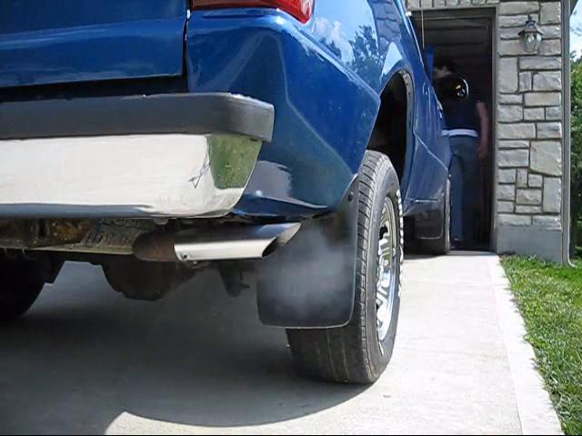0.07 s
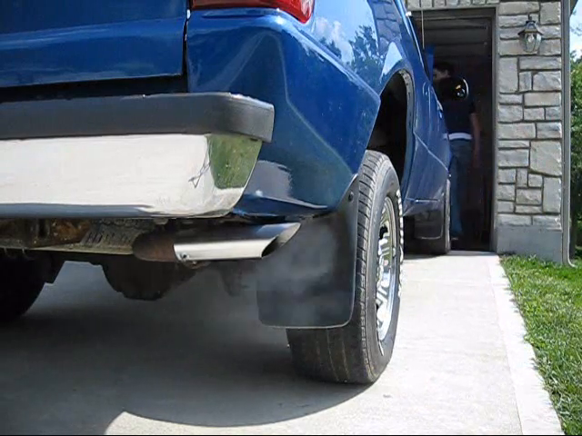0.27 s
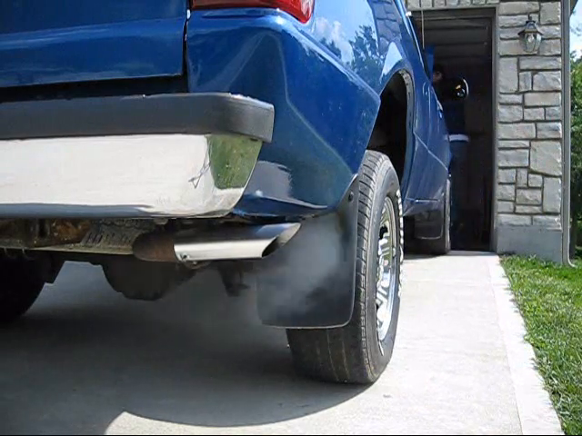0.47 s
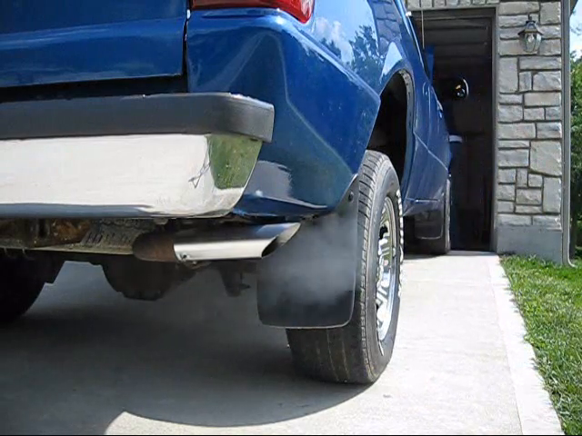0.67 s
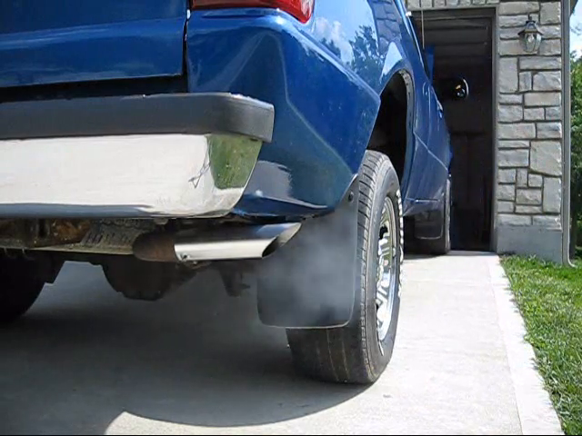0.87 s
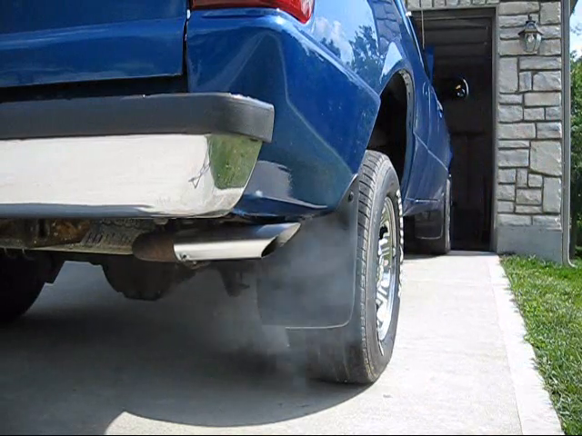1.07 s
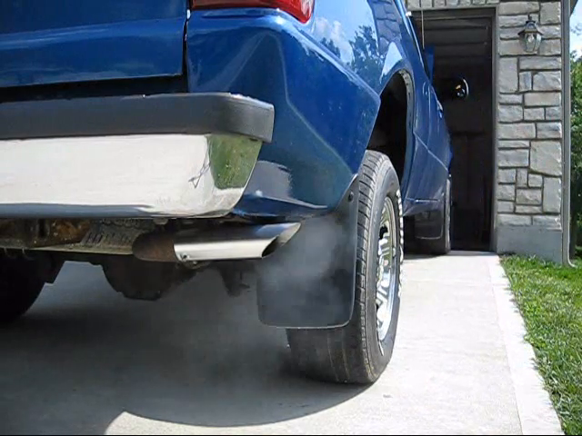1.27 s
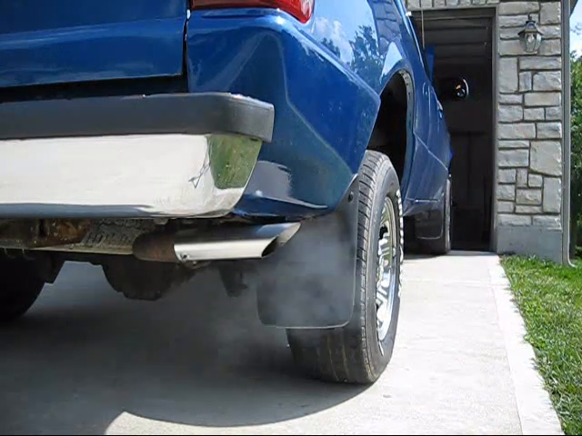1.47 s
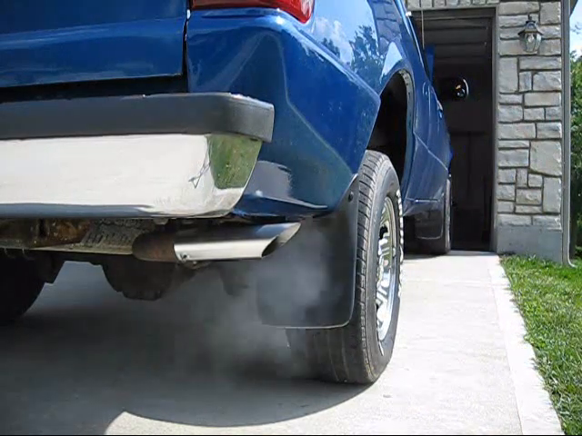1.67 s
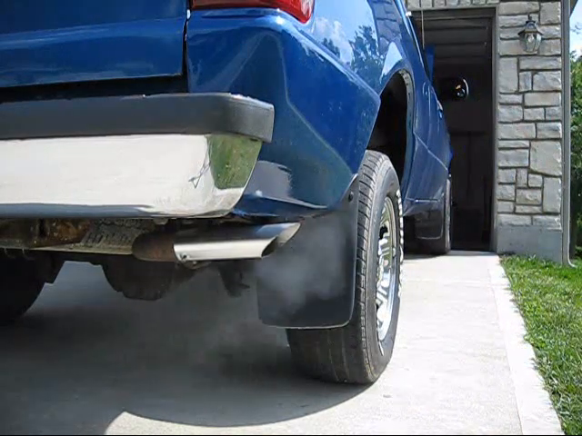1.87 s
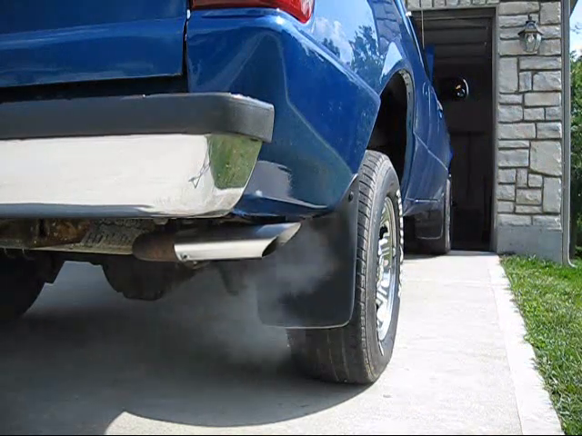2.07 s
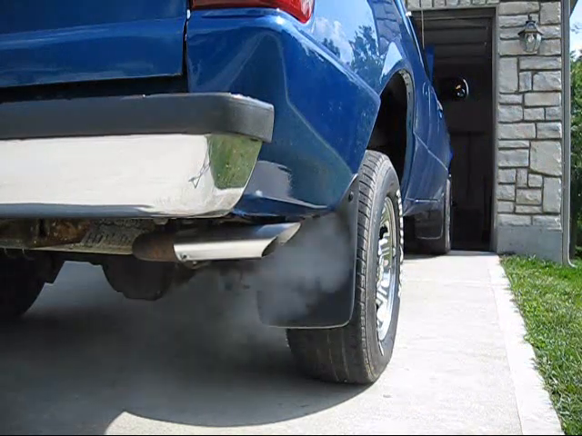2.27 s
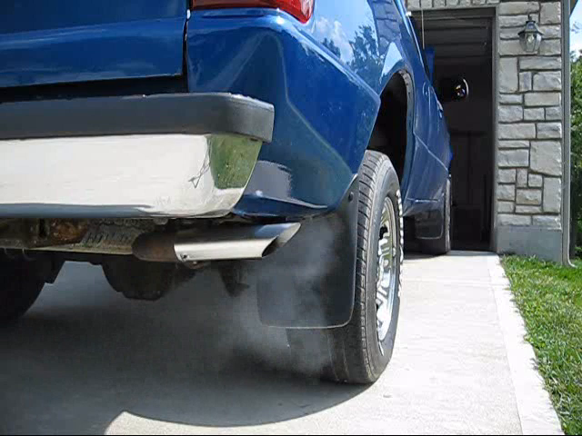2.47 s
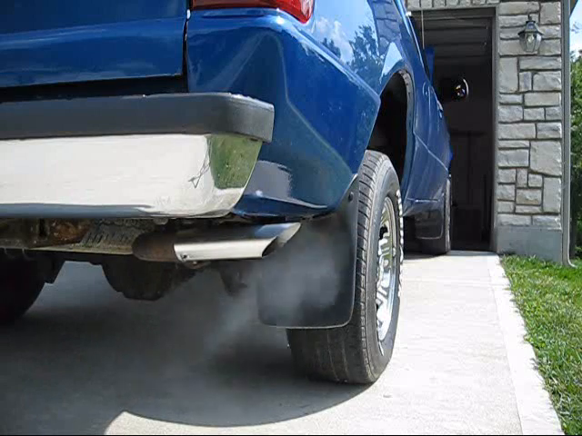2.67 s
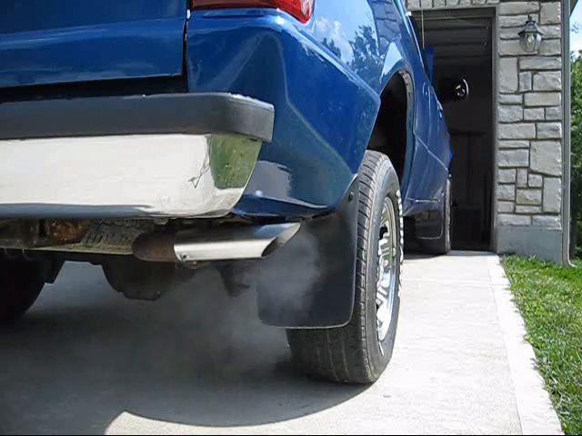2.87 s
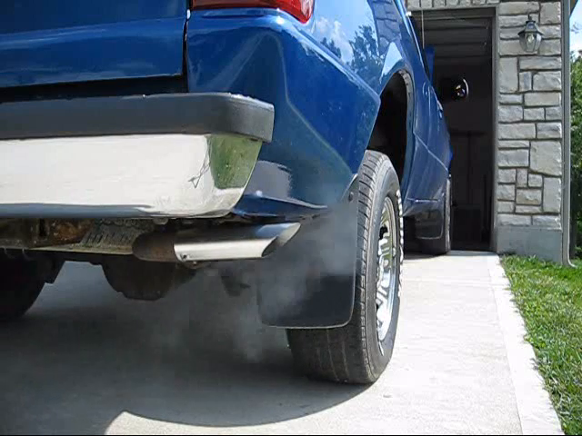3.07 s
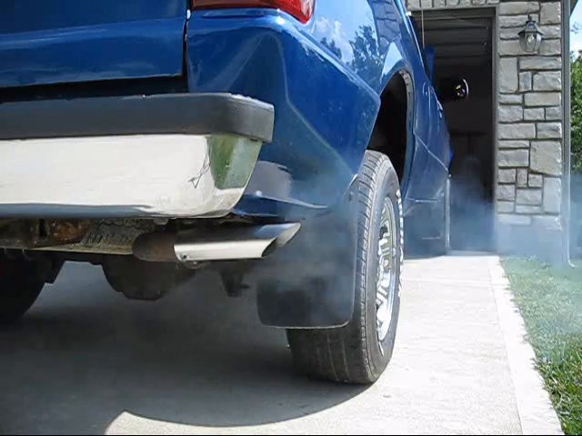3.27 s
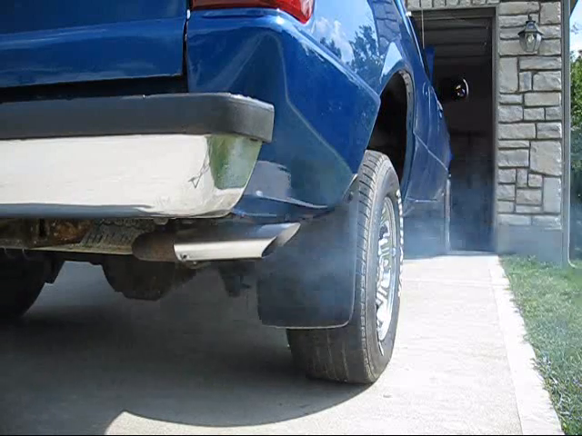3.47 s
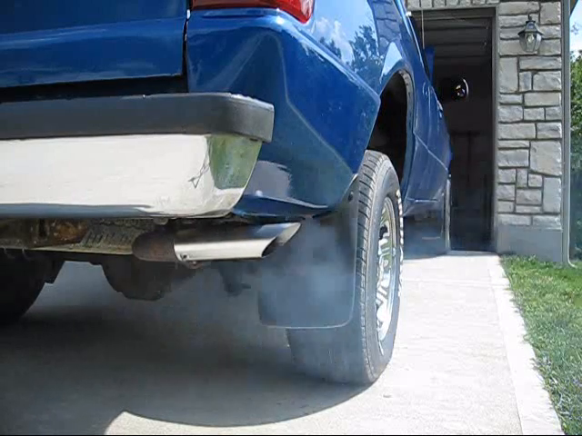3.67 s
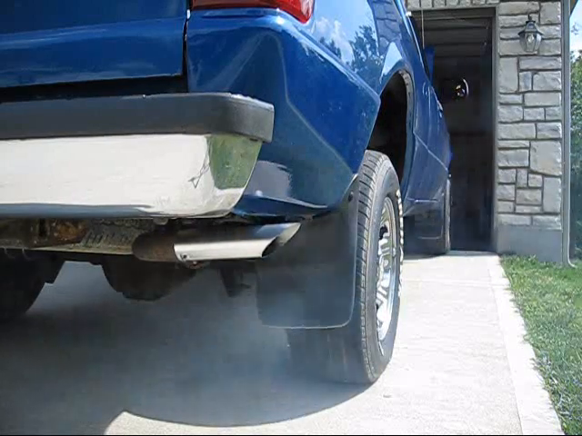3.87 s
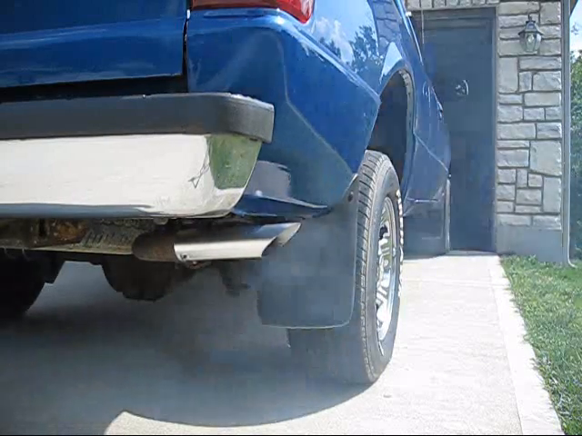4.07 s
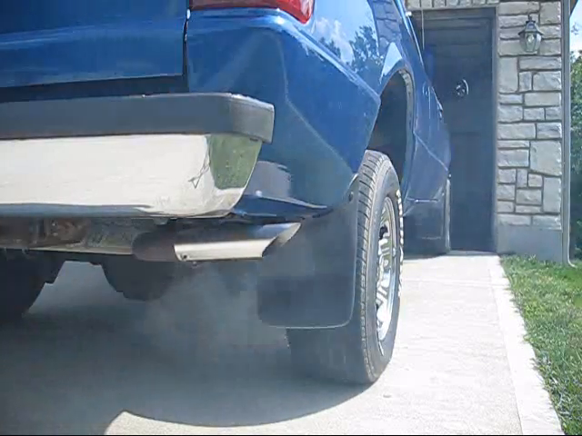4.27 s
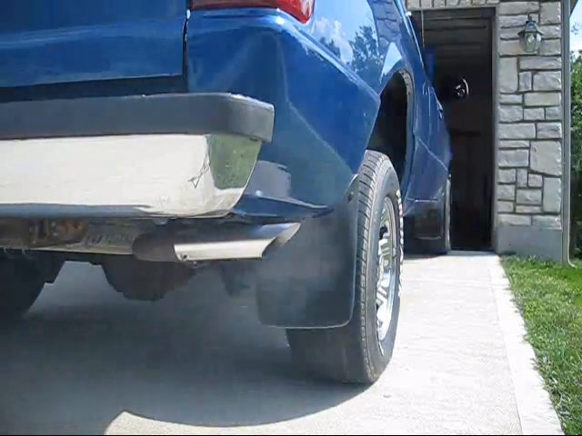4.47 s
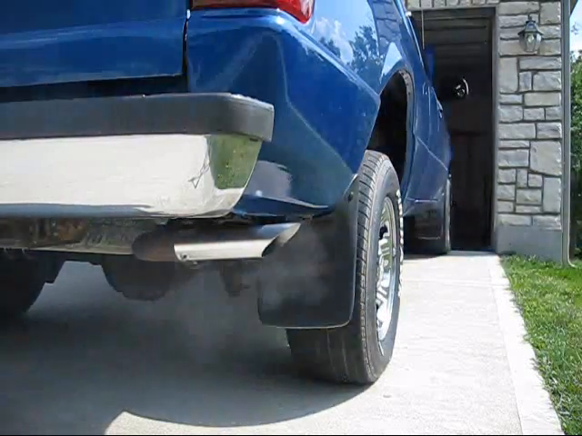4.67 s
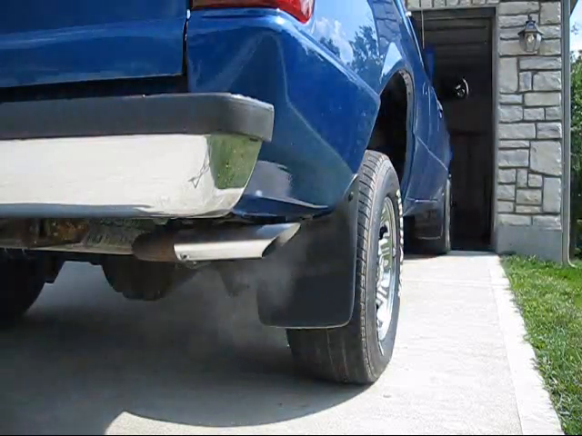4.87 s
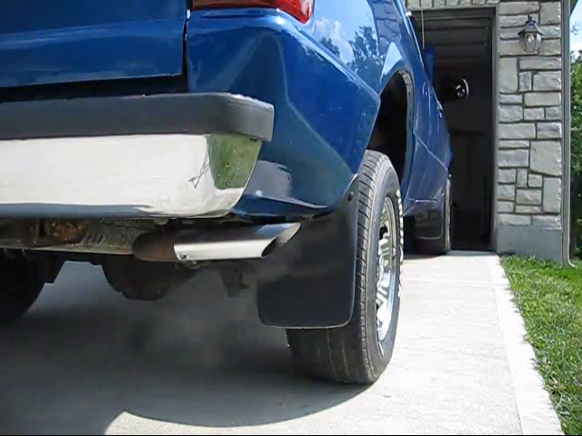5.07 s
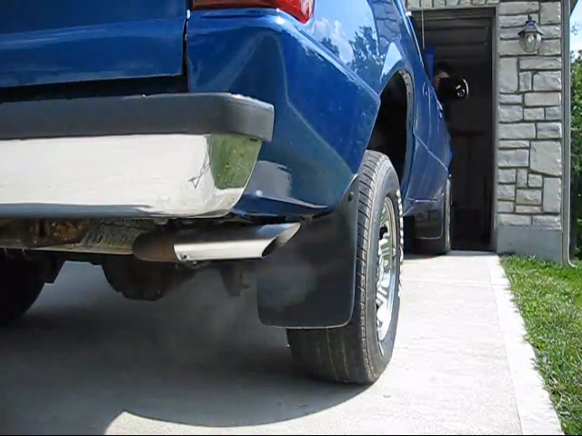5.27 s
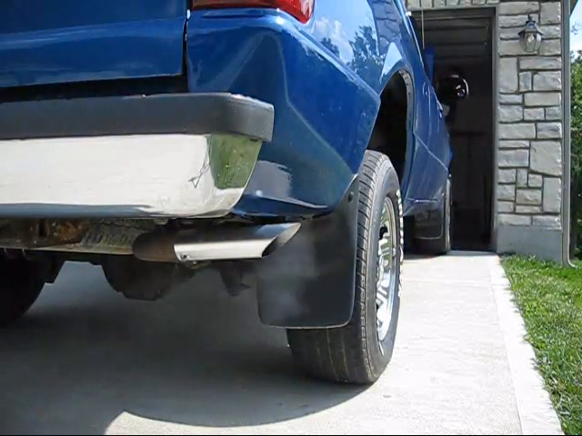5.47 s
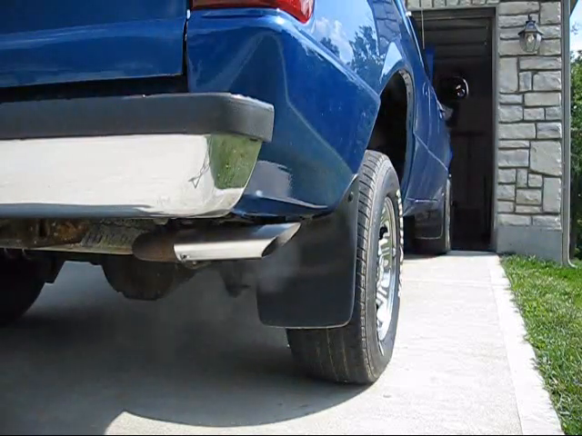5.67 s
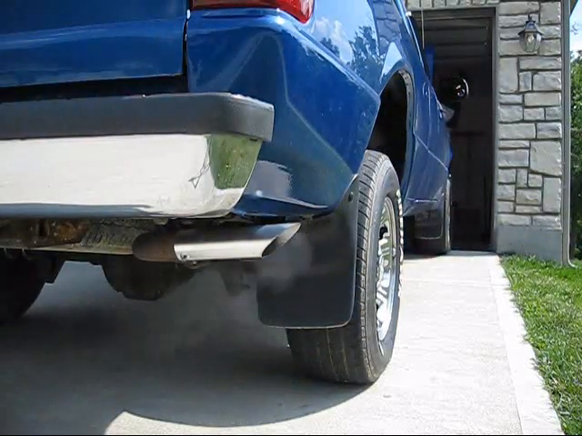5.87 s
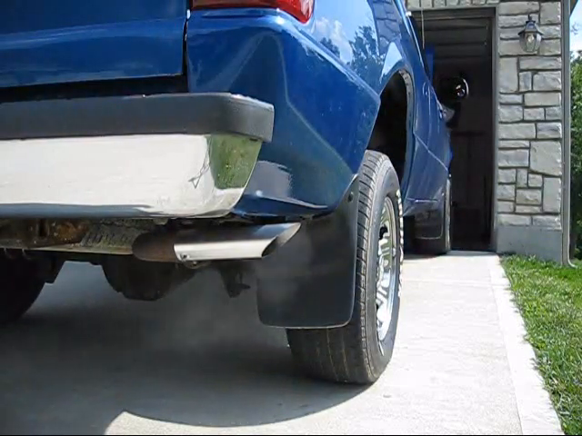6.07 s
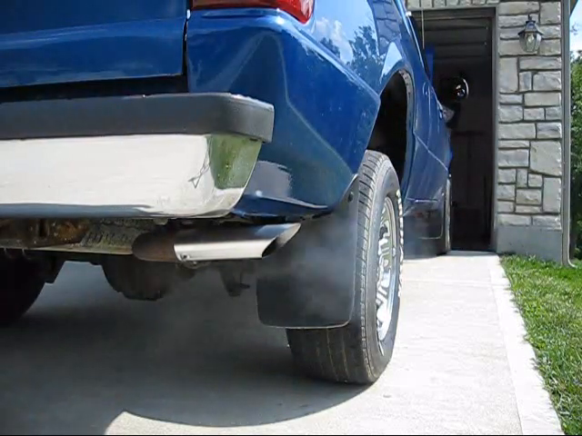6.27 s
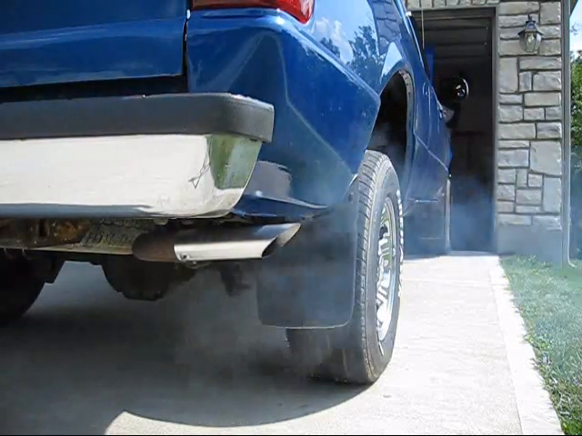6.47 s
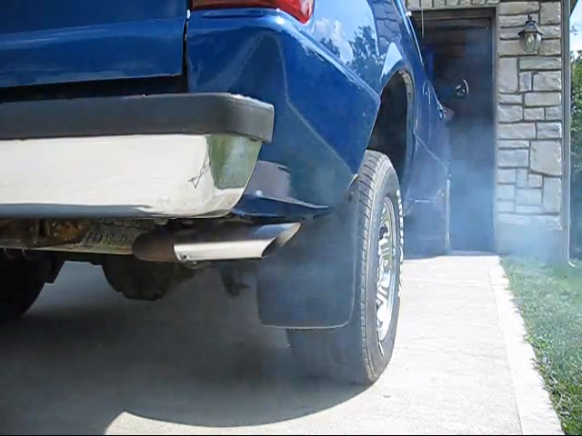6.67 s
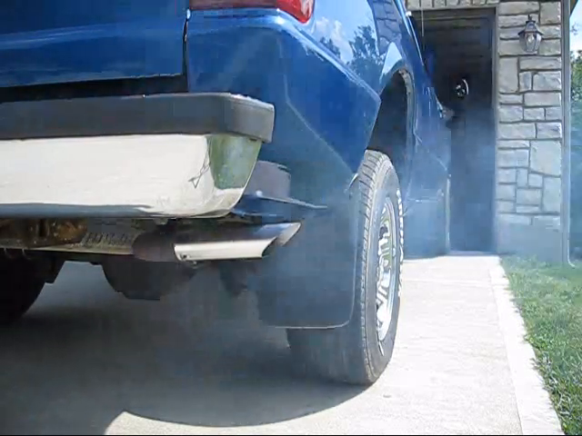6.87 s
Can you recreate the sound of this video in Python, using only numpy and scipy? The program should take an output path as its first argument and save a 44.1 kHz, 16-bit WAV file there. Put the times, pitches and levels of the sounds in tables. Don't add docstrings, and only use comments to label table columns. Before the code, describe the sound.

Outdoor close-up of an exhaust: soft, fast, lumpy idle pulses with breathy hiss, thin high insect chirps behind. After about three seconds the engine revs abruptly, rasping at first, then smoothly winds down. Dull wind buffets crowd the small microphone, thickest just before a second hard rev, which rises higher than the first and ends at full pitch.

```python
import sys
import numpy as np
from scipy import signal
from scipy.io import wavfile
from scipy.ndimage import uniform_filter1d

SR = 44100
rng = np.random.default_rng(int(sys.argv[2]) if len(sys.argv) > 2 else 0)


def output_pcm(signal):
    pcm = np.clip(np.atleast_2d(signal).T, -1, 1) * 32767
    wavfile.write(sys.argv[1], SR, np.round(pcm).astype(np.int16))


def voltage_ratio(level):
    return 10 ** (np.asarray(level, float) / 20)


N = 304731

# t/s, firings per second/Hz
SPEED = [(0.0, 35.71), (0.916, 34.76), (2.254, 35.7), (3.143, 35.31), (3.247, 43.88), (3.316, 61.16),
         (3.499, 81.34), (3.6, 84.01), (3.692, 81.25), (3.887, 69.39), (3.959, 68.03), (4.281, 50.22),
         (4.903, 40.19), (6.199, 33.92), (6.329, 42.25), (6.619, 91.75), (6.755, 103.2), (6.91, 105.26)]
RASP_IDLE_DB = -49.5


def in_time(rows):
    s, *columns = np.transpose(rows)
    return [np.interp(np.arange(N) / SR, s, c) for c in columns]


def rms_one(x):
    return x / np.sqrt(np.mean(x ** 2) + 1e-20)


def evened(x, span_s):
    return x / np.sqrt(uniform_filter1d(x * x, size=int(span_s * SR)) + 1e-12)


def drift(rate):
    r = np.exp(-80 * np.pi * rate / SR)
    white = rng.standard_normal(N // 40 + 2002)
    slow = signal.lfilter([1], [1, -2 * r, r * r], white)[2000:]
    return np.interp(np.arange(N) / 40, np.arange(len(slow)), rms_one(slow))


def resonance(x, hz, width_hz):
    r = np.exp(-np.pi * width_hz / SR)
    top = (1 - r * r) / 2 * np.array([1, 0, -1])
    return signal.lfilter(top, [1, -2 * r * np.cos(2 * np.pi * hz / SR), r * r], x)


def sharp_resonance(x, hz, width_hz):
    return resonance(resonance(x, hz, width_hz), hz, width_hz)


def coloured_noise(spectrum, patchy_db):
    hz, level_db = np.transpose(spectrum)
    edges = np.geomspace(hz[0], hz[-1], int(3 * np.log2(hz[-1] / hz[0])) + 1)
    white, out = rng.standard_normal((2, N)), 0
    for k, (low, high) in enumerate(zip(edges, edges[1:])):
        band_filter = signal.butter(2, [low, high], "band", fs=SR, output="sos")
        band = signal.sosfilt(band_filter, white[k % 2])
        band_db = np.interp(np.log(low * high) / 2, np.log(hz), level_db)
        out = out + band * voltage_ratio(band_db + patchy_db * drift(18))
    return rms_one(out)


def bursts(events, length_s, damping):
    out, size = np.zeros(N), 4096
    t = np.arange(size) / SR
    for (s, peak_db, hz), noise in zip(events, rng.standard_normal((len(events), size))):
        lump = noise * t * np.exp(-t / length_s)
        lump = sharp_resonance(lump, hz, damping * hz)
        i = int(s * SR)
        out[i:i + size] += voltage_ratio(peak_db) * lump / np.max(np.abs(lump))
    return out


def octaves_over_idle():
    return np.maximum(np.log2(in_time(SPEED)[0] / 35), 0)


def rasp_db():
    # t/s, held/s, rasp level/dB
    blips = [
        (3.256, 0.08, -20),
        (3.72, .01, -50),
        (6.36, .005, -24),
        (6.41, 0.053, -19),
        (6.55, 0.034, -28),
    ]
    rise_db_per_s, fall_db_per_s = 277, 124
    t = np.arange(N) / SR
    levels = []
    for s, held, db in blips:
        before, after = np.maximum(s - t, 0), np.maximum(t - s - held, 0)
        levels.append(np.maximum(db - rise_db_per_s * before - fall_db_per_s * after, RASP_IDLE_DB))
    return np.max(levels, axis=0)


def throttle_load():
    return (rasp_db() - RASP_IDLE_DB) / 20


def exhaust_note(turns):
    # t/s, level/dB, halves (weak-strong firing)/dB, tilt per octave/dB
    engine = [(0, -28, -15, -4), (1.35, -27, -17, -0.5), (3.05, -30.5, 3, -2), (3.3, -9, -30, -4),
              (3.45, -17, -2, 1.5), (3.6, -11, -7.5, 1.5), (3.7, -26, 10, 8), (3.8, -17, 2.5, -9),
              (4.0, -18, 3.5, -2.5), (4.1, -37, 10.5, -6), (4.5, -22.5, -26, -1), (4.7, -22.5, -41, -8),
              (4.82, -34.5, -4, 0.5), (6.0, -27, -2, -0.5), (6.4, -12, -22, -6.5), (6.62, -12, 1, -1),
              (6.76, -12, -10, 13), (6.91, -18, -1.5, 17)]
    # f/Hz, level/dB
    standing = [(30, -44), (45, -30), (58, -10), (70, -8), (88, -11), (105, -11), (140, 0), (175, -10),
                (210, -7), (255, -13), (285, -15), (315, -28), (420, -26), (520, -34)]
    idle_focus = 1.3
    upper_hz, upper_db_per_octave = 204, 2
    per_s, = in_time(SPEED)
    level_db, half_db, tilt_db = in_time(engine)
    pipe_hz, pipe_db = np.transpose(standing)
    idle = 0.3 * np.clip((52 - per_s) / 14, 0, 1)
    note = 0
    for order in np.arange(1, 17) / 2:
        hz = order * per_s
        boost_db = np.interp(np.log(hz), np.log(pipe_hz), pipe_db)
        off_peak = idle * np.maximum(boost_db, -12)
        waver = 1 - off_peak
        order_db = boost_db + idle_focus * off_peak
        order_db = order_db + tilt_db * np.log2(np.minimum(hz, 230) / 140)
        order_db = order_db + half_db * (order % 1 > 0)
        upper = np.clip(hz / upper_hz - 0.5, 0, 1) ** 2
        order_db = order_db + upper_db_per_octave * octaves_over_idle() * upper
        swing = voltage_ratio(waver * drift(4))
        phase = 2 * np.pi * order * turns + 0.12 * waver * drift(3) + idle * order ** 2
        note = note - voltage_ratio(order_db) * swing * np.cos(phase)
    return np.sqrt(2) * voltage_ratio(level_db) * note


def ragged_pulses(at, chance, scatter_db, jitter_s):
    cylinder_db = [7.7, -1, 4.6, -5, 6.5, 3.5]
    # f/Hz, width/Hz, level/dB
    pipe_modes = [(95, 110, 0), (215, 130, -4), (430, 200, -18), (765, 60, -20)]
    level_db = np.minimum(-36.5 + 24 * octaves_over_idle(), -21)
    level_db = level_db - 5 * throttle_load()
    moved = np.clip(at + (jitter_s * SR * chance[:, 0]).astype(int), 0, N - 1)
    strength_db = np.array(cylinder_db)[np.arange(len(at)) % 6] + scatter_db * chance[:, 1]
    pulses = np.zeros(N)
    pulses[moved] = -voltage_ratio(strength_db) * chance[:, 0]
    soft_edges = signal.butter(2, (48, 500), "band", fs=SR, output="sos")
    pulses = signal.sosfilt(soft_edges, pulses) + 1e-18
    ringing = 0
    for k, (hz, width, db) in enumerate(pipe_modes):
        ringing = ringing + (-1) ** k * voltage_ratio(db) * resonance(pulses, hz, width)
    return voltage_ratio(level_db) * evened(ringing, span_s=0.36)


def rasp_puffs(at, chance):
    # f/Hz, width/Hz, level/dB
    rasp_colour = [(786, 380, 2.5), (1460, 490, 2.5), (2280, 530, -3), (3200, 770, -16.5),
                   (5700, 1700, -24.5)]
    puffs = np.zeros((len(rasp_colour), N))
    puffs[:, at] = voltage_ratio(1.5 * chance[:, 2] + 2.5 * chance[:, 3:].T)
    decay = np.exp(-1 / (0.0016 * SR))
    gates = signal.lfilter([1], [1, -2 * decay, decay ** 2], puffs)
    rasp = 0
    for gate, (hz, width, db) in zip(gates, rasp_colour):
        rasp = rasp + voltage_ratio(db) * sharp_resonance(gate * rng.standard_normal(N), hz, width)
    rasp = voltage_ratio(rasp_db()) * evened(rasp, span_s=0.074)
    return rasp, evened(gates.sum(axis=0), span_s=0.19)


def exhaust(scatter_db, jitter_s):
    turns = np.cumsum(in_time(SPEED)[0]) / SR
    note = exhaust_note(turns)
    at = np.flatnonzero(np.diff(np.floor(turns + 0.16)))
    chance = rng.standard_normal((1000, 8))[:len(at)]
    ragged = ragged_pulses(at, chance, scatter_db, jitter_s)
    rasp, gate = rasp_puffs(at, chance)
    return note + ragged + rasp, gate


def gas_flow(gate):
    # t/s, level/dB
    flow = [(0, 0.5), (3.1, 0), (3.25, 3), (3.36, 0), (3.47, -7), (3.58, 2), (3.7, 8.5), (3.81, 4.5),
            (3.98, -1), (4.08, 5.5), (4.3, 2.5), (5.2, .5), (6.2, 1), (6.43, 3.5), (6.55, -6.5), (6.68, -4),
            (6.85, 1.5), (6.91, 6)]
    # f/Hz, level per Hz/dB
    jet_colour = [(30, -5), (60, 4), (200, 2.5), (430, -6), (750, -6), (980, -8.5), (1590, -11),
                  (2330, -18), (4000, -42.5), (5200, -91)]
    # f/Hz, level per Hz/dB
    hiss_colour = [(2000, -0.5), (2600, 2.5), (3200, -1), (4000, -3), (6100, -4.5), (7000, -12),
                   (7600, -11), (8300, -20.5), (9500, -11.5), (11000, -6.5), (13000, -12.5)]
    # f/Hz, width/Hz, level/dB
    whistles = [(770, 90, -43), (1184, 35, -53), (1530, 70, -48)]
    # t/s, half length/s, level/dB
    swell = (2.115, 0.084, 2.9)
    flow_db, = in_time(flow)
    load = throttle_load()
    rise_db = 0.7 * flow_db + 5.5 * octaves_over_idle() + load
    at_s, half_s, swell_db = swell
    rise_db = rise_db + swell_db * np.exp(-((np.arange(N) / SR - at_s) / half_s) ** 2)
    jet = voltage_ratio(-29 + rise_db) * coloured_noise(jet_colour, patchy_db=0.5) * (0.9 + 0.085 * gate)
    late_load = np.roll(load, int(0.07 * SR))
    spit = 0.016 + 0.55 * late_load ** 2
    hiss = voltage_ratio(-37.5 + flow_db) * coloured_noise(hiss_colour, patchy_db=1.5)
    hiss = hiss * (1.068 + spit * gate) * voltage_ratio(0.23 * drift(13))
    tones = 0
    for hz, width, db in whistles:
        tone = rms_one(sharp_resonance(rng.standard_normal(N), hz, width))
        tones = tones + voltage_ratio(db + 0.29 * drift(2.3)) * tone
    return jet + hiss + tones * voltage_ratio(rise_db)


def insects():
    # f/Hz, from t/s, to t/s, level/dB
    trills = [(11702, 0, 1.3, -63), (11702, 2.05, 3.15, -58), (11702, 4.65, 6.0, -65), (11590, 0, 3.0, -66),
              (11590, 4.2, 6.0, -62), (11292, .2, 2.1, -62)]
    chirp_s = [.207, .38, .55, .74, .93, 1.13, 1.29, 1.44, 1.714, 1.89, 2.07, 2.235, 2.39, 2.54, 2.7, 2.87,
               3.19, 4.14, 4.3, 4.455, 4.78, 4.96, 5.14, 5.33, 5.5, 5.69, 5.94, 6.1, 6.33]
    t = np.arange(N) / SR
    out = bursts([(s, -43, 10300) for s in chirp_s], length_s=0.014, damping=0.013)
    for hz, start, end, db in trills:
        on = np.clip(np.minimum(t - start, end - t) / 0.05, 0, 1)
        trill = rms_one(sharp_resonance(rng.standard_normal(N), hz, 25))
        out = out + voltage_ratio(db + 2.5 * drift(8)) * on * trill
    return out


def breeze():
    # t/s, peak level/dB, f/Hz
    buffet_events = [(0.573, -14, 293), (0.72, -14.5, 235), (4.109, -9, 202), (4.245, -3, 380),
                     (4.265, -10, 235), (4.284, -17, 353), (4.364, -16, 258), (4.471, -14, 270),
                     (5.299, -11.5, 338), (5.332, -13, 252), (5.4, -10, 302), (5.447, -13, 298),
                     (5.487, -8, 250), (5.503, -12.5, 261), (5.543, -9, 316), (5.577, -2, 360),
                     (5.619, -6.5, 300), (5.64, -12, 410), (5.693, -23, 270), (5.747, -21, 247),
                     (5.825, -16, 346), (5.873, -10, 400), (5.908, -2.5, 470), (6.008, -7.5, 370),
                     (6.044, -4, 360), (6.06, -8.5, 450), (6.131, -11.5, 240), (6.208, -4.5, 407),
                     (6.242, -5, 460), (6.266, -8, 230)]
    # t/s, half length/s, level/dB
    gusts = [
        (0, 0.11, -49),
        (0.647, 0.11, -37),
        (4.307, 0.74, -25.5),
        (5.477, 0.047, -20),
        (5.616, 0.043, -20),
        (5.766, 0.071, -18),
        (6.048, 0.048, -20),
        (6.277, 0.11, -21),
    ]
    rebounds = [(s + 0.00699, db - 4, 246) for s, db, hz in buffet_events]
    t = np.arange(N) / SR
    gust = voltage_ratio(-46)
    for s, half_s, db in gusts:
        gust = gust + voltage_ratio(db) * np.exp(-((t - s) / half_s) ** 2)
    buffets = bursts(buffet_events + rebounds, length_s=0.0011, damping=1.2)
    lumpy_noise = rng.standard_normal(N) * voltage_ratio(5.5 * drift(55))
    rumble = gust * rms_one(sharp_resonance(lumpy_noise, 215, 244))
    return signal.sosfilt(signal.butter(4, 1150, fs=SR, output="sos"), buffets + rumble)


def water_gurgles():
    # t/s, peak level/dB, f/Hz
    plops = [
        (1.999, -22.5, 630),
        (2.029, -31, 641),
        (2.464, -21, 760),
        (2.772, -51.5, 730),
        (2.874, -23, 614),
        (2.94, -21, 650),
        (2.974, -24, 770),
    ]
    return bursts(plops, length_s=0.0035, damping=0.29)


def scene():
    pipe, gate = exhaust(scatter_db=-2.0, jitter_s=0.0011)
    mix = pipe + gas_flow(gate) + insects() + breeze() + water_gurgles()
    return mix[None]


def roll_off(x):
    return signal.sosfilt(signal.butter(12, 13480, fs=SR, output="sos"), x)


def record(dry):
    x = signal.sosfilt(signal.butter(2, 22, "high", fs=SR, output="sos"), dry)
    x = 1.05 * np.tanh(x / 1.05)
    x = signal.sosfilt(signal.cheby2(4, 42, (7700, 8070), "bandstop", fs=SR, output="sos"), x)
    x = signal.sosfilt(signal.ellip(12, 1, 80, 12450, fs=SR, output="sos"), x)
    return roll_off(x)


dry = scene()
out = record(dry)
output_pcm(out)
```